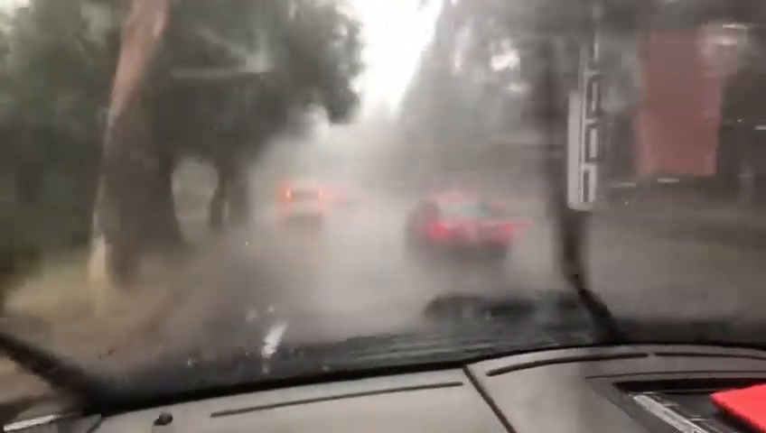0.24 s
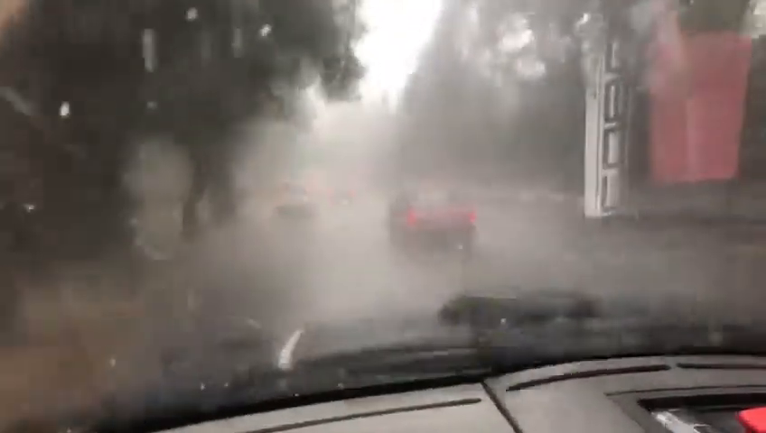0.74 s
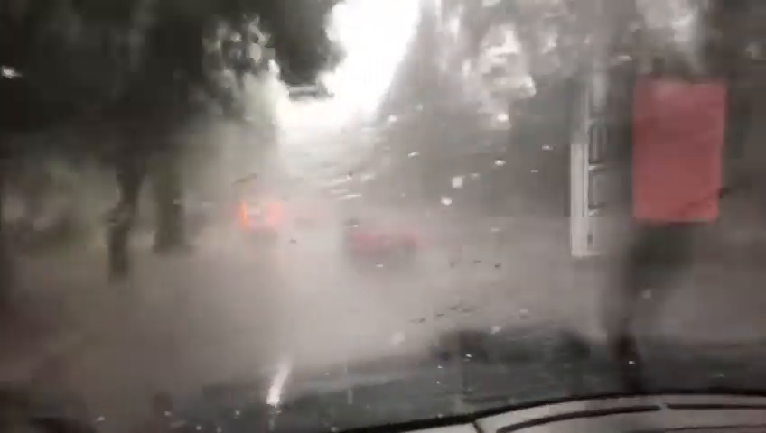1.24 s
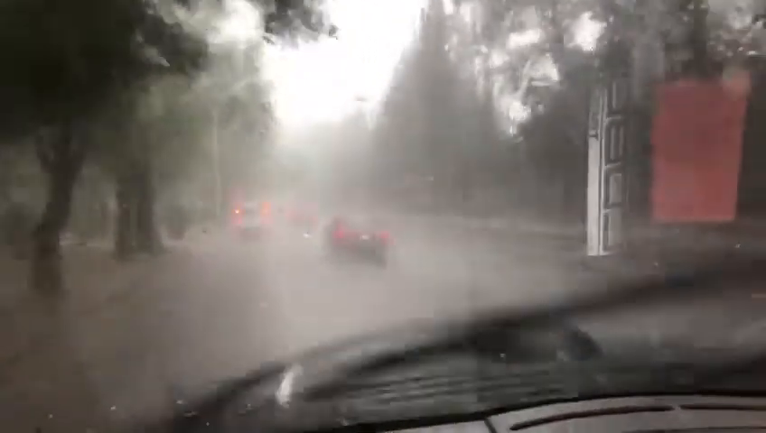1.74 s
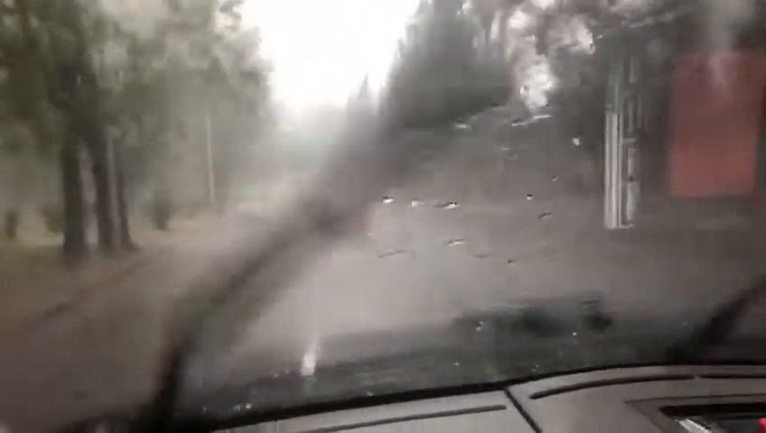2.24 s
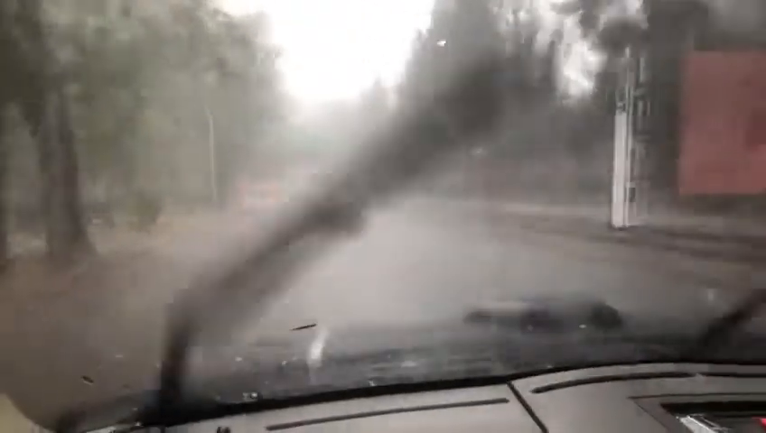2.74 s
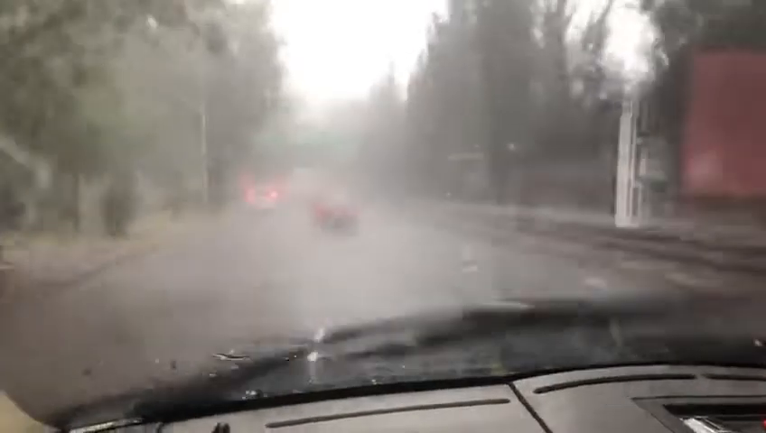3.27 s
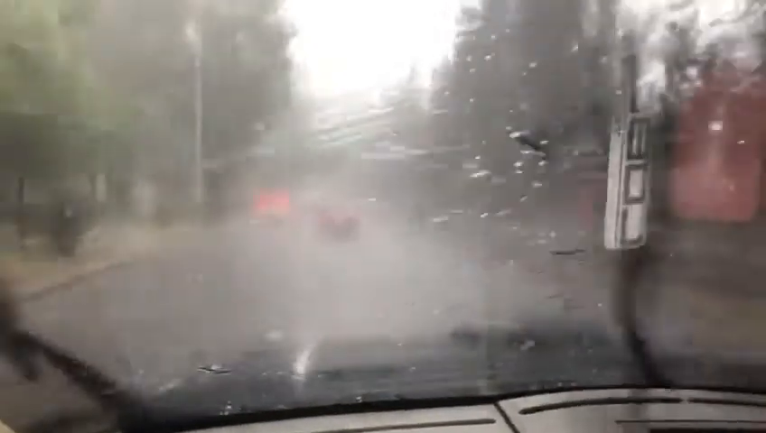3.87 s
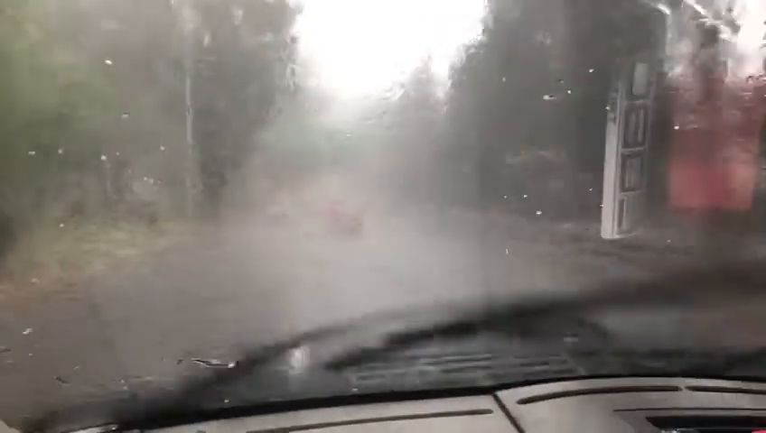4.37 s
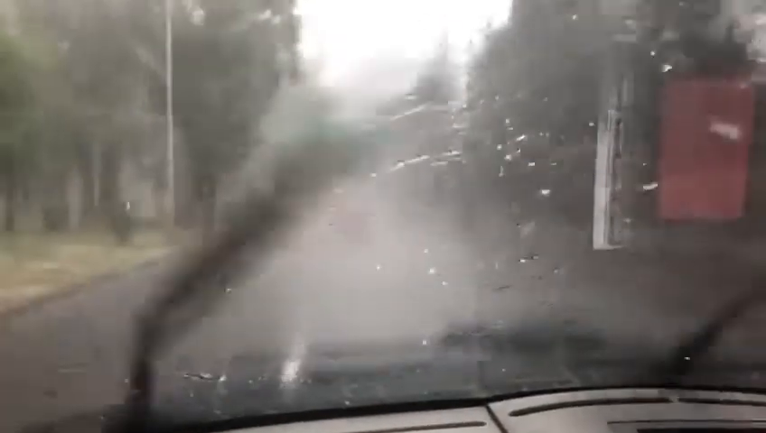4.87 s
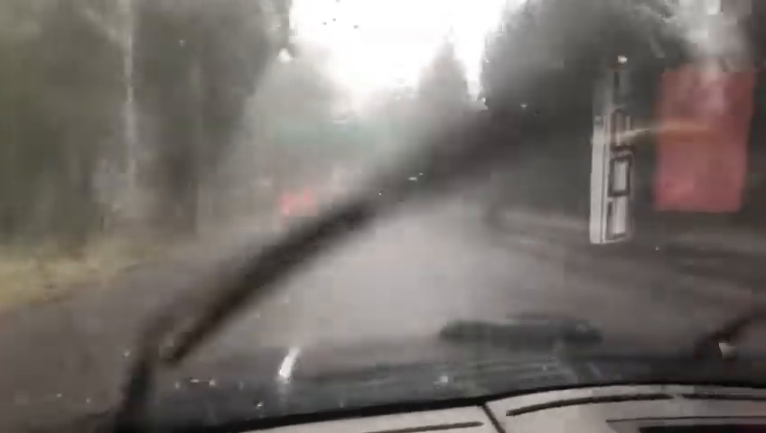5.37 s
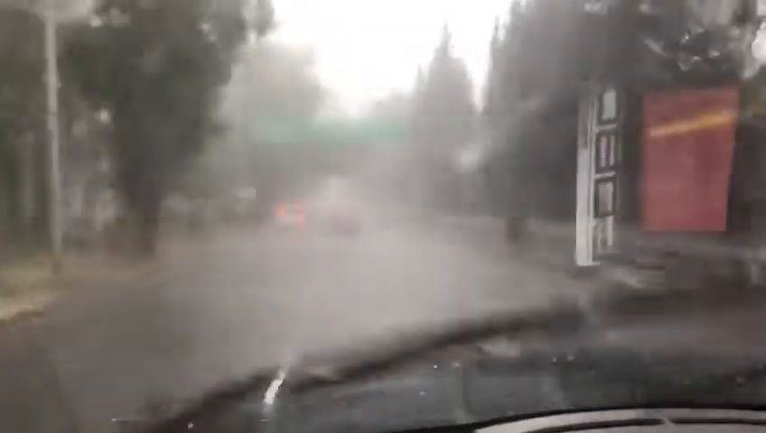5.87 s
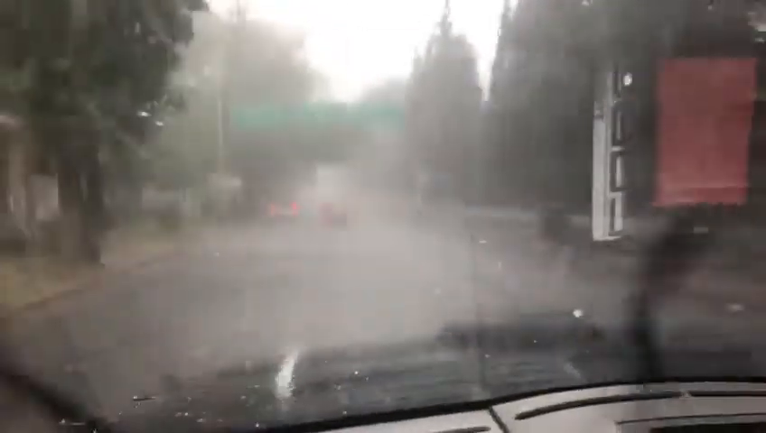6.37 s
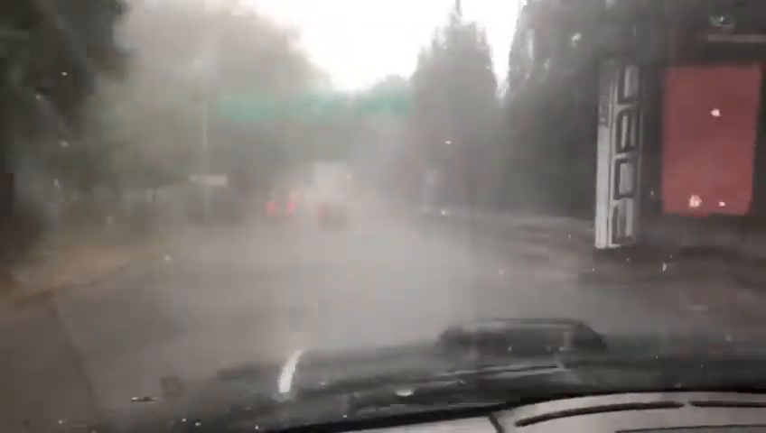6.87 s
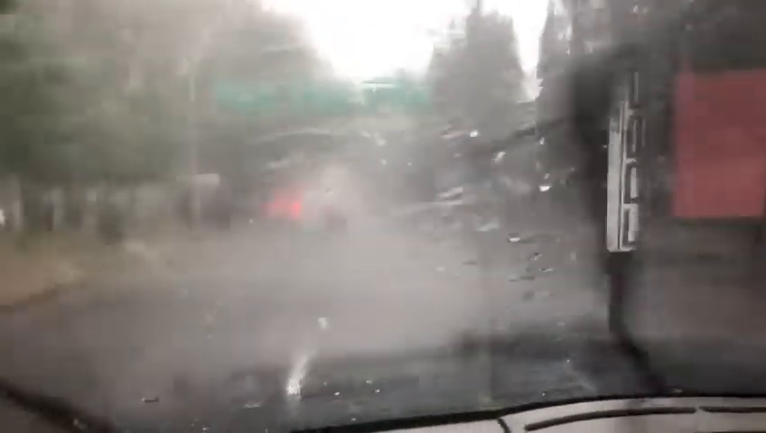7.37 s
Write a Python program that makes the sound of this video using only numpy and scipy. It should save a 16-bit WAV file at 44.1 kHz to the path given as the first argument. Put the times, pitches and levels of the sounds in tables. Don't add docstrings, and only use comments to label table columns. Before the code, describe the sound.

Inside a moving car in a hailstorm, hard stones crack and snap on the windshield at uneven gaps, some very loud. Duller thuds drum on the padded roof and low booms shake the body. Small hail and raindrops patter constantly between them over a low rumble. A phone close to the glass captures it, treble dulled and loudest peaks rounded.

```python
import sys
import numpy as np
from scipy import signal
from scipy.fft import rfft, irfft
from scipy.io import wavfile
from scipy.ndimage import uniform_filter1d

SR = 44100
rng = np.random.default_rng(int(sys.argv[2]) if len(sys.argv) > 2 else 0)


def store_wav(level_fs):
    pcm = np.round(np.clip(np.atleast_2d(level_fs), -1, 1) * 32767)
    wavfile.write(sys.argv[1], SR, pcm.T.astype(np.int16))


def linear_from_db(decibels):
    return 10 ** (np.asarray(decibels, float) / 20)


N = 336042

# start in seconds, peak in dB, ring in Hz.
GLASS_STONES = [(0.1198, -4.5, 3390), (0.208, -17, 3600), (0.2703, -3.5, 3030), (0.6968, 11, 3410),
                (1.3136, -2.5, 3500), (1.6776, -3.5, 2980), (1.7365, -6.5, 2450), (1.7719, -3, 2900),
                (1.894, -4, 3430), (2.1287, -3.5, 2720), (2.4553, 0, 3160), (2.5386, -7, 3520),
                (2.571, 0, 2700), (2.7548, -3.5, 3780), (3.3732, -2.5, 2860), (3.5162, -6, 3030),
                (3.9746, 1, 2920), (4.1846, 1.5, 3640), (4.3641, -3.5, 2900), (4.4592, -3, 3850),
                (4.5493, 0, 3230), (4.7044, -6.5, 2900), (4.8578, -5, 3240), (5.1908, -9, 3880),
                (5.245, -7, 3170), (5.5025, -0.5, 2980), (5.7188, 3, 4030), (6.2272, 5, 3580),
                (6.3525, 3, 2660), (6.462, -22, 2770)]
# start in seconds, peak in dB, ring in Hz.
GLASS_SNAPS = [(0.393, 3, 2900), (0.9177, 2, 3940), (1.1075, -2, 2800), (1.2054, 4, 3340),
               (1.3798, 0.5, 2700), (1.4733, 3, 2630), (1.702, -6, 3120), (1.9033, 4, 3810),
               (2.59, 1, 3250), (2.6176, 3, 2880), (2.7906, 3, 3000), (3.2952, -4, 3330),
               (3.5426, 0.5, 2870), (3.9431, 6, 2720), (4.0738, 0, 3200), (4.2146, 5, 3110),
               (4.322, 2, 3290), (4.7805, 0, 2730), (5.384, -5, 2860), (5.614, 8, 2820),
               (5.6937, -1.5, 2850), (5.7761, 3, 3800), (5.889, 3, 3480), (5.9692, 3, 2530),
               (6.2402, 1, 3740), (6.2816, 6, 4120), (6.6214, 6, 3030), (6.795, 3, 3580), (6.993, 0, 3550),
               (7.315, 0, 3770)]
# start in seconds, length in seconds, depth in dB.
GLASS_LULLS = [(0.035, 0.076, -5.5), (0.086, 0.031, -30), (0.197, 0.085, -9), (1.281, 0.056, -23),
               (1.486, 0.03, -15), (1.552, 0.056, -8), (1.639, 0.036, -23), (1.863, 0.032, -8),
               (2.096, 0.055, -10), (2.36, 0.059, -8.0), (2.428, 0.038, -17), (2.516, 0.038, -15),
               (2.628, 0.062, -18), (2.702, 0.051, -17), (3.079, 0.038, -25), (3.254, 0.068, -11.0),
               (3.315, 0.038, -16), (3.424, 0.16, -19), (4.016, 0.045, -12), (4.271, 0.043, -18),
               (4.338, 0.035, -10), (4.368, 0.049, -17), (4.66, 0.046, -20), (4.786, 0.12, -15),
               (4.864, 0.037, -27), (5.014, 0.022, -20), (5.127, 0.069, -23), (5.654, 0.044, -6),
               (5.79, 0.056, -4.5), (6.569, 0.068, -9.5)]
# frequency in Hz, gain in dB.
TICK_COLOUR = [(300, -1.5), (1200, 8), (2000, 7.5), (3000, 15.5), (4000, 11.5), (6000, -2.5), (9000, -13.5),
               (12500, -12)]
# frequency in Hz, gain in dB.
DROP_COLOUR = [(500, -40), (2000, 1.5), (3500, 1.5), (6000, -9.5), (9000, -8.5), (12000, -3)]
# start in seconds, peak in dB, ring in Hz.
ROOF_THUDS = [(0.093, -14, 318), (0.197, -23, 410), (0.911, -8, 611), (1.031, -3, 740), (1.344, -6.5, 298),
              (1.586, -6.5, 323), (1.931, -17, 393), (2.183, -7, 790), (2.252, -10, 369), (2.467, -13, 304),
              (3.074, -8, 363), (3.324, -4.5, 298), (3.943, -16, 355), (4.366, -19, 350), (4.485, -19, 378),
              (4.648, -21, 328), (4.862, -8, 358), (4.963, -7.5, 430), (5.191, -20, 366),
              (5.246, -13.5, 358), (5.387, -5.5, 715), (5.631, -5, 310), (5.734, -8, 705), (6.136, -5, 434),
              (6.718, -9.5, 348), (7.154, -9, 313), (7.278, -7.5, 375), (7.577, -9, 685)]
# frequency in Hz, gain in dB.
DRUM_COLOUR = [(60, -19), (150, -0.5), (270, -4), (370, -5), (750, -7.5), (1300, -12), (2500, -22.5),
               (6000, -66.5)]
# frequency in Hz, width in Hz, lift in dB.
PANEL_MODES = [(354, 13.3, -3), (745, 49, -11)]
# start in seconds, peak in dB, ring in Hz.
SHELL_BOOMS = [(0.073, 0, 75), (0.189, 4, 104), (0.309, -14, 59.2), (0.43, -6, 51.1), (0.737, -7, 78.1),
               (0.918, -10, 64.6), (1.278, -10.5, 60.6), (2.045, -9, 51.1), (2.239, -6, 95),
               (2.659, -3.5, 119), (2.909, -10, 58), (3.073, -2.5, 81.6), (3.2, 0, 57.6), (3.26, -10, 67.3),
               (3.327, -9, 64.6), (3.551, -6.5, 79), (3.899, -19.5, 88), (4.302, -11, 78.1),
               (4.473, 0, 70.0), (4.732, -4, 51.5), (4.855, -2.5, 152), (4.949, -3, 51.1),
               (5.453, -15.5, 74.6), (6.038, -4, 75.5), (6.141, -3.5, 117), (6.488, -4, 51),
               (6.778, -6, 51.1), (7.085, 1, 67.5), (7.149, -6, 125)]
# frequency in Hz, gain in dB.
RUMBLE_COLOUR = [(15, -42), (26, -4.5), (42, -2.5), (90, -5), (160, -13.5), (400, -49)]
# time in seconds, strength on the glass in dB, strength on the roof in dB.
DOWNPOUR = [(0, -20, -16.5), (.55, -13.5, -15.5), (1.0, -15.5, -15), (1.3, -16, -18), (1.75, -17, -17.5),
            (2.2, -16, -18.5), (2.6, -17.5, -20), (3.0, -17.5, -16.5), (3.45, -18, -17), (3.8, -17, -17),
            (4.1, -15, -15.5), (4.35, -15, -17), (5.0, -15.5, -14.5), (5.6, -15.5, -17),
            (6.1, -14.5, -14.5), (6.45, -15.5, -16), (6.9, -15, -17.5), (7.62, -15, -14)]
# frequency in Hz, gain in dB.
MIC_RESPONSE = [(20, 0.5), (7000, -1), (9500, -11.5), (11500, -20)]


def windshield(pour_db):
    lull_db = lulls()
    strength_db = 0.23 * (pour_db + 13.5) + 5.1 * lull_db
    big_s = np.sort(np.r_[np.transpose(GLASS_STONES)[0], np.transpose(GLASS_SNAPS)[0]])
    impacts = glass_cracks(strength_db, big_s) + glass_snaps(strength_db, big_s)
    return impacts + glass_patter(pour_db, lull_db, big_s)


def glass_cracks(strength_db, big_s):
    ordinary = hail(29, 0.5 + strength_db, 3177, big_s)
    s, db, hz = np.hstack([np.transpose(GLASS_STONES), ordinary])
    edge_db = -8 + 4 * rng.standard_normal(len(s))
    return blows(s, np.minimum(db + 3.0, 2.5), hz, edge_db, q=1.2, rough=3.0,
                 swell_s=0.00075, tail_db=-4, t60_s=0.09, size=4096)


def glass_snaps(strength_db, big_s):
    chips = hail(30, -11 + strength_db, 5610, big_s)
    s, db, hz = np.hstack([np.transpose(GLASS_SNAPS), chips])
    return blows(s, np.minimum(db + 0.5, 3), hz, np.full(len(s), 6.5), q=0.67, rough=0.91,
                 swell_s=0.00021, tail_db=-9, t60_s=0.1, size=2048)


def glass_patter(pour_db, lull_db, big_s):
    ticks = shower(220, spread_db=2.8, contact_s=0.0013, tail_db=-8, t60_s=0.07)
    drops = shower(2500, spread_db=-4, contact_s=0.00075, tail_db=-18, t60_s=0.045)
    patter = level(colour(ticks, TICK_COLOUR), -9) + level(colour(drops, DROP_COLOUR), -3.5)
    t = np.arange(N) / SR
    until_s = np.r_[big_s, 99][np.searchsorted(big_s, t)] - t
    hush_db = -6.5 * np.exp(-(until_s / 0.016) ** 2)
    gust_db = 4.8 * walk(25)
    return linear_from_db(pour_db + 0.39 * lull_db + hush_db + gust_db) * patter


def hail(per_s, size_db, hz, big_s):
    before_s, after_s = 0.028, 0.0079
    size_spread_db, pitch_spread = 4, 0.537
    chance = rng.random((230, 3))
    s = np.cumsum(0.4 - 0.6 * np.log(1 - chance[:, 0])) / per_s
    falls = s < N / SR
    s = s % (N / SR)
    ahead_s = big_s - s[:, None]
    near = np.where(ahead_s > 0, ahead_s / before_s, -ahead_s / after_s).min(axis=1)
    db = size_db[(s * SR).astype(int)] + size_spread_db * np.log(chance[:, 1])
    db = db - 30 * np.exp(-near ** 4)
    return s, np.where(falls, db, -99), hz * (1 + pitch_spread * (chance[:, 2] - 0.5))


def lulls():
    t = np.arange(N) / SR
    depth_db = np.zeros(N)
    for s, length_s, db in GLASS_LULLS:
        corners_s = [s, s + 0.15 * length_s, s + length_s - 0.004, s + length_s]
        depth_db += db * np.interp(t, corners_s, [0, 1, 1, 0])
    return depth_db


def roof(pour_db):
    s, db, hz = np.transpose(ROOF_THUDS)
    thuds = blows(s, np.minimum(db + 1.5, 1.5), hz, np.full(len(s), -5.5), q=0.79, rough=2.8,
                  swell_s=0.0043, tail_db=0, t60_s=0.11, size=8192)
    patter = shower(300, spread_db=3.0, contact_s=0.0073, tail_db=3.5, t60_s=0.14)
    skin = colour(patter, DRUM_COLOUR)
    drum = skin.copy()
    for mode_hz, width_hz, lift_db in PANEL_MODES:
        b, a = signal.iirpeak(mode_hz, mode_hz / width_hz, SR)
        drum += linear_from_db(lift_db) * signal.lfilter(b, a, skin)
    return thuds + linear_from_db(pour_db + 0.38 * lulls()) * level(drum, 0.5)


def shell(pour_db):
    s, db, hz = np.transpose(SHELL_BOOMS)
    booms = blows(s, np.minimum(db, 0), hz, np.full(len(s), -5.5), q=0.92, rough=7.5,
                  swell_s=0.012, tail_db=10, t60_s=0.1, size=16384)
    swell_db = 0.087 * pour_db + 1.33 * walk(9.9)
    rumble = colour(rng.standard_normal(N), RUMBLE_COLOUR) * linear_from_db(swell_db)
    return booms + level(rumble, -18.5)


def blows(s, peak_db, hz, edge_db, q, rough, swell_s, tail_db, t60_s, size):
    t = np.arange(size) / SR
    noise = rng.standard_normal((len(s), 2, size))
    late = np.maximum(t - rng.uniform(0.0022, 0.00595, (len(s), 1)), 0) / swell_s
    splinters = rng.uniform(0, 0.63, (len(s), 1)) * late * np.exp(1 - late)
    press = t / swell_s * np.exp(1 - t / swell_s) + splinters
    contact = press * (np.sin(2 * np.pi * hz[:, None] * t) + rough * noise[:, 0])
    tail = linear_from_db(tail_db - 60 * t / t60_s) * (1 - np.exp(-t / swell_s)) * noise[:, 1]
    shudder = contact + tail
    crack = contact + 0.64 * tail * np.exp(-t / 0.017)
    ratio = (np.arange(size // 2 + 1) * SR / size + 1) / hz[:, None]
    ring = 1 / (1 + 1j * q * (ratio - 1 / ratio))
    edge = (1j * ratio / (1 + 1j * ratio)) ** 2 / (1 + 1j * ratio / 3)
    sound = irfft(rfft(shudder) * ring + rfft(crack) * linear_from_db(edge_db)[:, None] * edge, size)
    sound *= (linear_from_db(peak_db) / np.abs(sound).max(axis=1))[:, None]
    out = np.zeros(N + size)
    np.add.at(out, (s * SR).astype(int)[:, None] + np.arange(size), sound)
    return out[:N]


def shower(per_s, spread_db, contact_s, tail_db, t60_s):
    size = np.minimum(rng.exponential(size=N), 3)
    hits = (rng.random(N) < per_s / SR) * linear_from_db(2 * spread_db * size)
    t = np.arange(SR // 8) / SR
    decay = np.exp(-2 * t / contact_s) + linear_from_db(2 * (tail_db - 60 * t / t60_s))
    power = np.abs(signal.fftconvolve(hits, decay)[:N])
    return np.sqrt(power) * rng.standard_normal(N)


def walk(rate_hz):
    hold = int(SR / rate_hz)
    steps = np.repeat(rng.standard_normal(N // hold + 1), hold)
    return uniform_filter1d(steps, hold)[:N]


def level(x, db):
    return x * linear_from_db(db) / np.sqrt(np.mean(x ** 2))


def colour(x, points):
    hz, db = np.transpose(points)
    size = 8192
    bin_hz = np.arange(size // 2 + 1) * SR / size + 1
    log_gain = np.interp(np.log(bin_hz), np.log(hz), db) * np.log(10) / 20
    cepstrum = irfft(log_gain)
    cepstrum[1:size // 2] *= 2
    cepstrum[size // 2 + 1:] = 0
    return signal.fftconvolve(x, irfft(np.exp(rfft(cepstrum))))[:len(x)]


def scene():
    s, glass, panel = np.transpose(DOWNPOUR)
    t = np.arange(N) / SR
    glass_db, roof_db = np.interp(t, s, glass), np.interp(t, s, panel)
    return (windshield(glass_db) + roof(roof_db) + shell(roof_db))[None]


def band_limit(x):
    return signal.sosfilt(signal.butter(12, 12320, fs=SR, output="sos"), x)


def record(dry):
    heard = colour(dry[0], MIC_RESPONSE)[None]
    rounded = heard / (1 + np.abs(heard / 0.85) ** 6) ** (1 / 6)
    lowpass = signal.ellip(8, 0.3, 60, 11600, fs=SR, output="sos")
    return band_limit(signal.sosfilt(lowpass, rounded))


dry = scene()
out = record(dry)
store_wav(out)
```